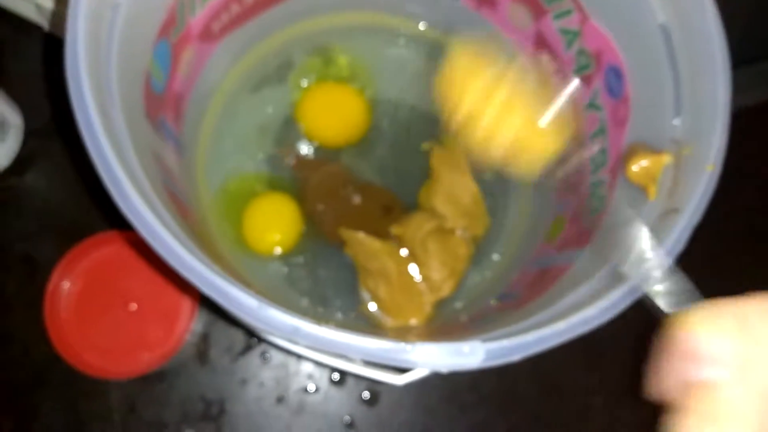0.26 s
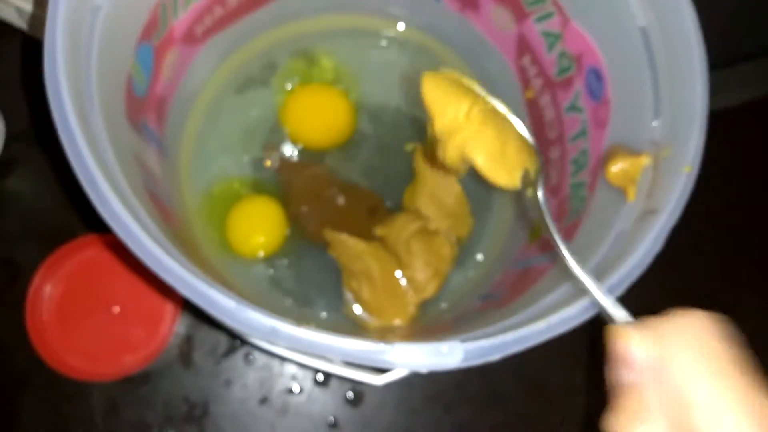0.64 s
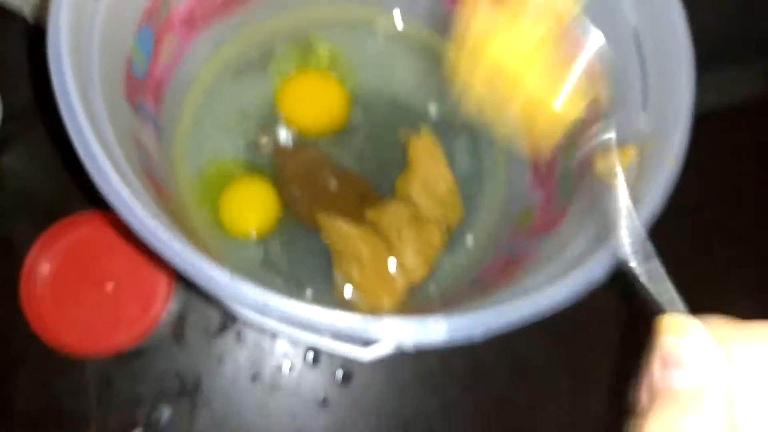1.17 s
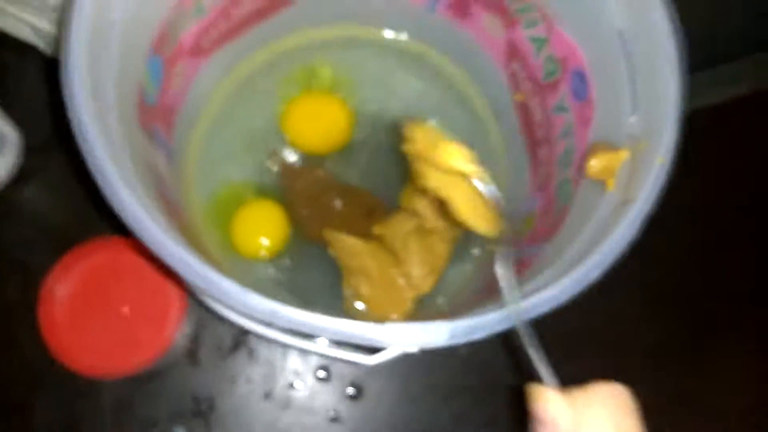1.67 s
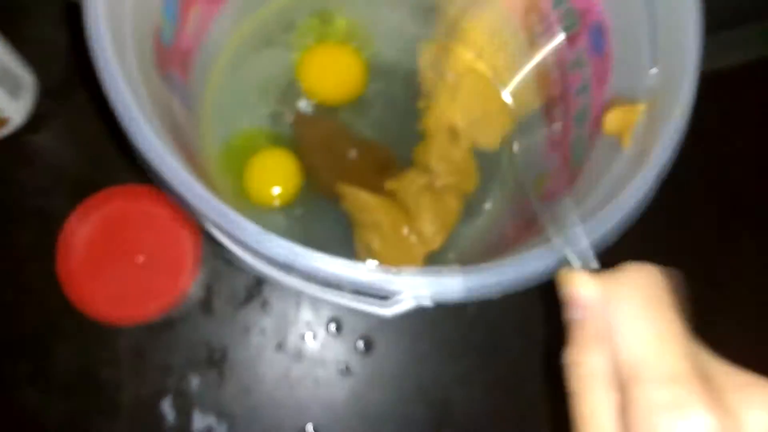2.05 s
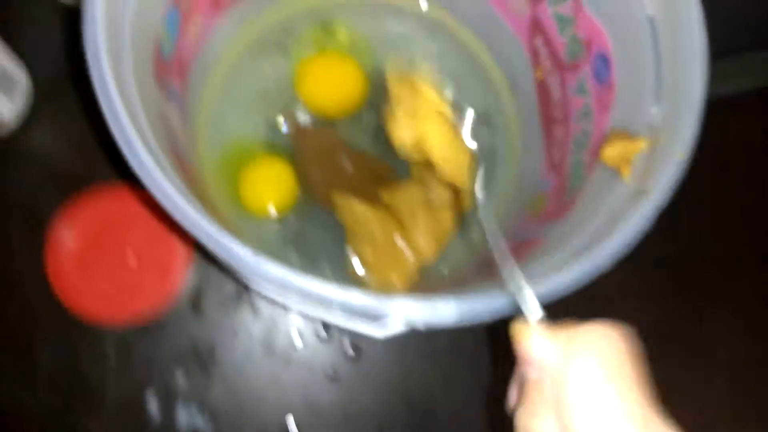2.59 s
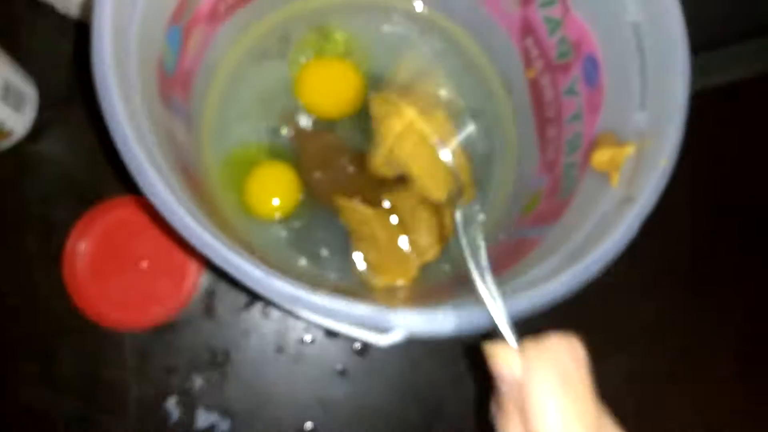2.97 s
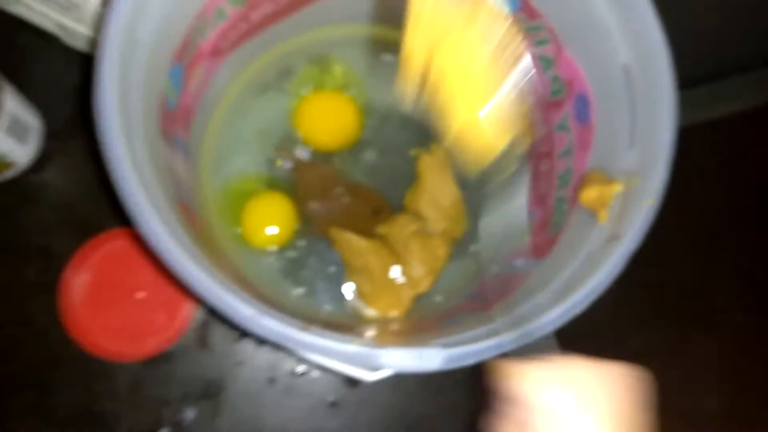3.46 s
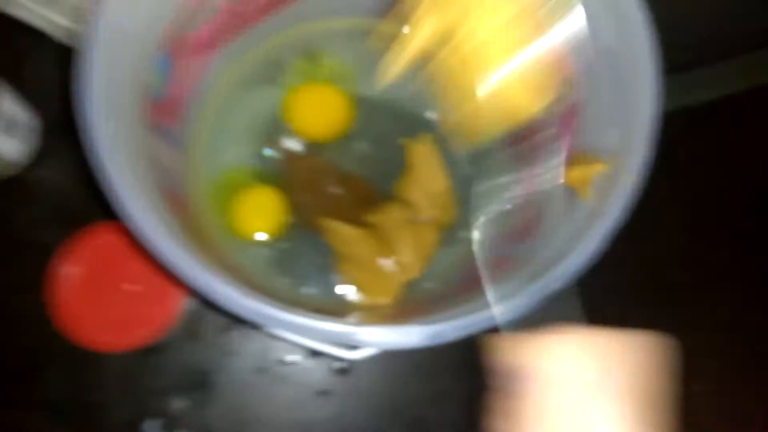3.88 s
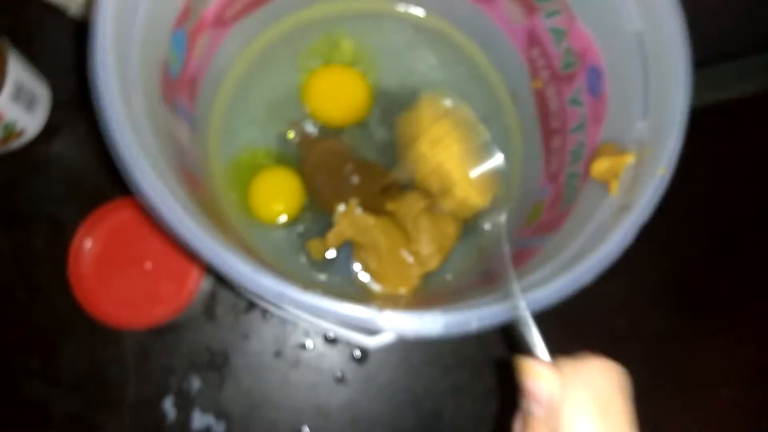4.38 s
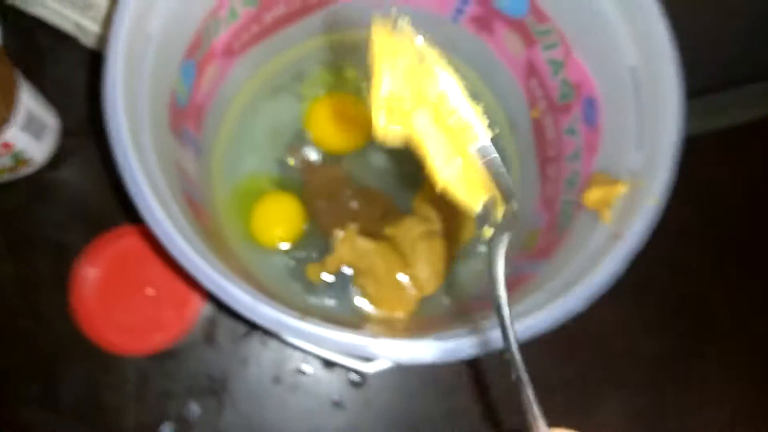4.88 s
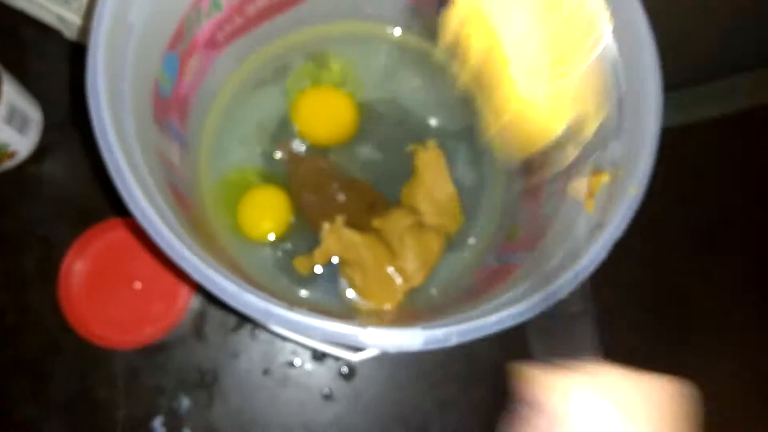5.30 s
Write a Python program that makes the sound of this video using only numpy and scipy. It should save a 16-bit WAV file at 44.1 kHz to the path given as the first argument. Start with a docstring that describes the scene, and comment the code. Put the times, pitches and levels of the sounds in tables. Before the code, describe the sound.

Seventeen sharp, hollow spoon knocks on a plastic bucket rim, very close and distorted, with short echoes and thin sleeve hiss between.

```python
"""A metal spoon is knocked seventeen times on the rim of a plastic tub to shake off sticky spread.
Each knock is a noisy snap, a short hard clack of dying sine waves, then a longer ring and echo.
Sometimes the spoon falls back and brushes the rim. Swelling noise makes a thin hiss, probably a sleeve.
A faint rumble and hum lie beneath. The microphones are so close that loud peaks are cut off flat."""
import sys
import numpy as np
from scipy import signal
from scipy.fft import rfft, irfft
from scipy.io import wavfile
from scipy.ndimage import uniform_filter1d

SR = 44100
rng = np.random.default_rng(int(sys.argv[2]) if len(sys.argv) > 2 else 0)


def inscribe(sig):
    """Save sig as 16-bit PCM at rate SR to the path in sys.argv[1].

    A 1-D sig is mono; a 2-D sig holds one channel per row.
    Samples are clipped to [-1, 1] before scaling.
    """
    pcm = np.round(np.clip(np.atleast_2d(sig).T, -1, 1) * 32767)
    wavfile.write(sys.argv[1], SR, pcm.astype(np.int16))


N = 244388  # samples in the whole scene
LENGTH = 24576  # samples in one knock


def amp(db):
    """Turns decibels into a plain multiplier."""
    return 10 ** (np.asarray(db) / 20)


def evened(x):
    """Scales a sound to an average strength (rms) of 1."""
    return x / np.sqrt(np.mean(x ** 2) + 1e-20)


def read(points, hz):
    """Reads a table between its points, spacing the frequencies as pitch (logarithmically)."""
    f, value = np.transpose(points)
    return np.interp(np.log(hz + 1), np.log(f + 1), value)


def add(mix, s, sound):
    """Adds a stereo sound at a time in seconds, cutting off what runs past the end."""
    start = round(s * SR)
    part = mix[:, start:][:, :sound.shape[1]]
    part += sound[:, :part.shape[1]]


def colour(x, points, size=2048):
    """Filters a sound to the table's tone, without any sound before its cause (minimum phase)."""
    hz = abs(np.fft.fftfreq(size, 1 / SR))
    log_gain = np.log(amp(read(points, hz)))
    response = np.exp(signal.hilbert(log_gain).conj())
    taps = np.fft.ifft(response).real[:size // 2]
    if x.ndim > 1:
        taps = taps[None]
    return signal.oaconvolve(x, taps, axes=-1)[..., :x.shape[-1]]


def dying(t, t60):
    """A fade that loses 60 dB every t60 seconds."""
    return np.exp(-np.log(1000) * t / t60)


def mode(t, hz, t60, left_db, right_db, lag):
    """One way an object vibrates: a dying sine, lag radians later in the right microphone."""
    level = amp([[left_db], [right_db]])
    delay = np.array([[0], [lag]])
    return level * dying(t, t60) * np.sin(2 * np.pi * hz * t - delay)


# how alike the two microphones sound; negative means opposed, as in the bass: (f/Hz, correlation)
LIKENESS = [(60, -0.88), (220, -0.93), (450, -0.55), (800, -0.19), (1200, 0.13), (8000, 0.024)]


def noise(points, size):
    """Noise from all around: two random signals are blended to make left and right suitably alike."""
    hz = np.fft.rfftfreq(size, 1 / SR)
    a, b = rfft(rng.standard_normal((2, size)))
    same = np.clip(read(LIKENESS, hz), -1, 1)
    right = same * a + np.sqrt(1 - same ** 2) * b
    return evened(irfft(np.array([a, right]) * amp(read(points, hz)), size))


# tone of the quiet kitchen's rumble: (f/Hz, relative level/dB)
FLOOR = [(20, -25), (40, -22), (60, -3), (85, -11), (118, -12), (170, -6.5), (450, -7), (800, -16),
         (1700, -27), (4000, -23.5), (15000, -29.5)]
# faint mains hum before the microphone's colour: (f/Hz, level/dB rms)
HUM = [(59.2, -56), (118.4, -49.5)]


def kitchen(floor_db=-52):
    """Steady low noise is the rumble; pure sines, opposed in the two microphones, are the hum."""
    t = np.arange(N) / SR
    hum = sum(amp(db) * evened(np.sin(2 * np.pi * hz * t)) for hz, db in HUM)
    return amp(floor_db) * noise(FLOOR, N) + hum * np.array([[1], [-1]])


# arm swings, probably a sleeve: (t/s, length/s, relative level/dB, rustle level against the hiss/dB)
SWISHES = [(0.026, 0.072, -31, -11.5), (0.421, 0.025, -11.5, -6.5), (1.118, 0.052, -18.5, -15.5),
           (1.487, 0.07, -21.5, -26), (1.626, 0.17, -24.5, -17), (1.947, 0.11, -29.5, -2),
           (2.127, 0.12, -25.5, -10), (2.725, 0.079, -26, -12.5), (3.791, 0.09, -29, -24),
           (3.859, 0.058, -21.5, -28), (4.78, 0.026, -30, -18), (5.24, 0.066, -29.5, -1)]
# tone of the thin hiss: (f/Hz, relative level/dB)
HISS = [(500, -8.5), (2500, -2.5), (5000, 0), (7000, 0), (11500, 0), (15500, 0)]
# tone of the duller rustle under it: (f/Hz, relative level/dB)
RUSTLE = [(200, -22.5), (800, -8), (1700, 0), (2600, -3.5), (4500, -7.5), (7000, -12.5), (10000, -40),
          (15000, -33)]
# every knock stops the arm and jolts the sleeve: length, level, and the rustle against the hiss
JOLT_S, JOLT_DB, JOLT_RUSTLE_DB = 0.051, -28, -9.5
SLEEVE_GROWTH = 0.83  # dB of jolt per dB of knocking force


def swishes(hiss_db=-9, rustle_db=0, rise_s=0.015, fade_t60=0.57, flutter_db=1.03):
    """The sleeve's noise swells at each swing and jolt; the kitchen carries it on as a slow fade."""
    t, hiss_power, rustle_power = np.arange(N) / SR, np.zeros(N), np.zeros(N)
    jolts = [(s, JOLT_S, JOLT_DB + SLEEVE_GROWTH * force_db, JOLT_RUSTLE_DB)
             for s, force_db, _ in KNOCKS]
    for s, length, db, dull_db in SWISHES + jolts:
        rise = 1 - np.exp(-np.maximum(t - s, 0) / rise_s)
        swell = rise * dying(np.maximum(t - s - length, 0), fade_t60)
        # overlapping noises add by power, the square of their level
        hiss_power += (amp(db) * swell) ** 2
        rustle_power += (amp(db + dull_db) * swell) ** 2
    wobble = uniform_filter1d(rng.standard_normal(N), size=160)
    flutter = amp(flutter_db * evened(wobble))
    hiss = amp(hiss_db) * np.sqrt(hiss_power) * noise(HISS, N)
    rustle = amp(rustle_db) * np.sqrt(rustle_power) * noise(RUSTLE, N)
    return flutter * (hiss + rustle)


def tick(spectrum, snap_t60, chatter_db, chatter_t60, room_db=-30, room_t60=0.5):
    """Metal meets plastic: noise with a fast fade (snap), a slower one (chatter) and a faint echo."""
    t = np.arange(LENGTH) / SR
    snap_fade = dying(t, snap_t60)
    chatter_fade = amp(chatter_db) * dying(t, chatter_t60)
    room_fade = amp(room_db) * dying(t, room_t60)
    return noise(spectrum, LENGTH) * (snap_fade + chatter_fade + room_fade)


# tone of the first snap of metal on plastic: (f/Hz, relative level/dB)
CRACK = [(500, 2), (2000, 6), (5000, -0.5), (9000, 2.5), (12000, -6.5), (16000, 0.5)]


def snap():
    """The hard first contact of spoon and rim: a very short burst of noise."""
    return tick(CRACK, snap_t60=0.023, chatter_db=-17.0, chatter_t60=0.088)


# vibrations of rim and spoon, before small pitch shifts:
# (f/Hz, time to fade by 60 dB/s, relative left level/dB, relative right level/dB)
CLACK = [(480.5, 0.046, -2.5, 2), (1064, 0.031, -5, 3), (1209.5, 0.057, -2, -10), (1613, 0.025, 10.5, 10),
         (1693, 0.038, -13.5, -1), (1882.6, 0.027, 5.5, 7.5), (2300, 0.085, -19, -5.5),
         (2706, 0.024, -5, -8.5), (3152, 0.075, -23, -9.5), (4380, 0.079, -36, -23),
         (5150, 0.048, -28, -14), (5880, 0.05, -30, -16.5)]
# single reflections from table, cupboards and walls:
# (delay t/s, left level/dB, right level/dB), both against the direct clack
WALLS = [(.0085, -27, -27), (0.0248, -17.5, -32), (0.0308, -14, -14), (0.0452, -15, -19),
         (.0560, -18.5, -37), (0.092, -24, -22)]


def clack(flex_cycles=1.75, lag=2.21, detune=0.015, give_s=0.000603):
    """The rim gives way, then each mode swings up in a couple of cycles; the spot struck shifts pitch."""
    t = np.maximum(np.arange(LENGTH // 4) / SR - give_s, 0)
    shifts = 1 + detune * rng.standard_normal(len(CLACK))
    direct = np.zeros((2, len(t)))
    for (hz, t60, left_db, right_db), shift in zip(CLACK, shifts):
        swing_up = 1 - np.exp(-(t * hz / flex_cycles) ** 2)
        direct += mode(t, hz * shift, t60, left_db, right_db, lag) * swing_up
    out = np.zeros((2, LENGTH))
    add(out, 0, direct)
    for delay, left_db, right_db in WALLS:
        add(out, delay, amp([[left_db], [right_db]]) * direct)
    return out


# long vibrations of tub, table and kitchen:
# (f/Hz, relative left level/dB, relative right level/dB, time to fade by 60 dB/s)
RING = [(66.6, -22.5, -19.5, 0.69), (133.3, -14, -17.5, 0.44), (179.8, -19, -32.5, 0.25),
        (214, -23.5, -26.5, 0.2), (264, -23, -20.5, 0.59), (292.2, -17.5, -24, 0.44),
        (386.6, -12.5, -15, 0.36), (444, -5, -8.5, 0.35), (481, -17.5, -20, 0.49), (489.4, -10, -15, 0.21),
        (974, -17, -40, 0.36), (1025, -18.5, -50, 0.22), (1090, -46, -30, 0.31), (1159, -16, -9, 0.32),
        (1226, -6.5, -12, 0.21), (1282, -19, -26, 0.51), (1390, -35.5, -36, 0.47), (1460, -40, -35, 0.31),
        (1523, -8.5, -8, 0.15), (1550, -23, -21, 0.26), (1640, -12.5, -18, 0.37), (1690, -9, -8.5, 0.25),
        (1777, -14, -26, 0.16), (1805, -27, -56, 0.3), (1880, -42, -24, 0.49), (2135, -17.5, -21, 0.22),
        (2304, -62, -17, 0.47), (2340, -29, -19.5, 0.31), (2510, -20.5, -19, 0.31),
        (3176, -41, -23.5, 0.54)]


def ring_modes(build_s=0.0063):
    """Tub, table and kitchen ring as dying sines that build up softly, one sound per mode."""
    t, modes = np.arange(LENGTH) / SR, []
    for k, (hz, left_db, right_db, t60) in enumerate(RING, 1):
        lag = np.arccos(np.clip(read(LIKENESS, hz), -1, 1))
        # neighbouring modes of a shell start in opposite directions
        modes.append((-1) ** k * mode(t, hz, t60, left_db, right_db, lag))
    return np.array(modes) * (1 - np.exp(-t / build_s))


# tone of the kitchen's echo of a knock: (f/Hz, relative level/dB)
ECHO = [(25, -21), (50, -7), (100, -6.5), (300, -3.5), (500, -2.5), (720, -10), (1000, -1.5), (1350, -6),
        (1730, 2.5), (2050, -6), (2500, -8.5), (3200, -12), (4500, -20.5), (7500, -27.5), (12000, -36.5)]
# how fast the echo dies: (f/Hz, time to fade by 60 dB/s)
ECHO_T60 = [(60, 0.89), (160, 0.51), (420, 0.38), (1100, 0.55), (2900, 0.54), (7700, 0.44)]


def echo(build_s=0.0025):
    """Blurred kitchen echo: noise builds up, then each band of pitch dies at its own speed."""
    hz, t, bands = signal.stft(noise(ECHO, LENGTH), SR, nperseg=512)
    fade = dying(t, read(ECHO_T60, hz)[:, None])
    tail = signal.istft(bands * fade, SR, nperseg=512)[1][:, :LENGTH]
    return tail * (1 - np.exp(-np.arange(LENGTH) / SR / build_s))


# knocks of the spoon's handle on the rim: (t/s, force level/dB, hardness as upward tilt/dB per octave)
KNOCKS = [(0.3933, -1.5, -1), (0.8528, 4.5, 1), (1.2682, 4.5, 0), (1.4400, -3, 0), (1.6329, 3, 0),
          (2.0564, 0, -0.5), (2.4462, 1, -.5), (2.8196, -2, -1), (2.9671, -2, -.3), (3.1515, 5.5, 1.2),
          (3.5510, -.5, 0), (3.9642, -.5, 0), (4.3483, -4.5, 0.5), (4.4892, -2.5, 1.5), (4.6526, 3, 1),
          (5.0083, 6, 1.5), (5.3695, 3.5, 0.3)]
# ring and echo grow in step with the force; clack and snap by these shares of it (dB per dB)
CLACK_GROWTH, SNAP_GROWTH = 0.37, 0.63
# the snap lies this far above the clack, so a hard blow lifts it most
SNAP_OCTAVES = 2.9


def knocks(clack_db=0.1, ring_db=-5.0, echo_db=-10, snap_db=-12.5, alike=0.56, vary_db=2.5):
    """Knocks land near one spot, so ring and much of the echo repeat; force and hardness set the mix."""
    out, modes, shared_echo = np.zeros((2, N)), ring_modes(), echo()
    for s, force_db, hardness in KNOCKS:
        mode_levels = amp(vary_db * rng.standard_normal(len(RING)))
        ring = np.tensordot(mode_levels, modes, 1)
        room = np.sqrt(alike) * shared_echo + np.sqrt(1 - alike) * echo()
        body = amp(clack_db + CLACK_GROWTH * force_db) * clack()
        body += amp(force_db) * (amp(ring_db) * ring + amp(echo_db) * room)
        # a harder blow sounds brighter: tilt over two octaves either side of 1600 Hz
        body = colour(body, [(400, -2 * hardness), (6400, 2 * hardness)])
        snap_level = amp(snap_db + SNAP_GROWTH * force_db + SNAP_OCTAVES * hardness)
        add(out, s, body + snap_level * snap())
    return out


# loosely held knocks that rebound: (approximate knock t/s, relative rebound level/dB)
REBOUNDS = [(1.260, -18), (2.057, -6.5), (2.448, -10), (2.818, -12), (3.965, -4.5), (4.65, -13)]
# tone of a light brush of the rim: (f/Hz, relative level/dB)
BRUSH = [(500, -5), (1800, 7.5), (5200, -3.5), (8500, -5), (12000, -13.5), (16000, -14)]
REBOUND_S = .068  # the spoon falls back this long after the listed time


def touches(level_db=-6):
    """The spoon rebounds and brushes the rim: a light burst of noise with a little chatter."""
    out = np.zeros((2, N))
    for s, db in REBOUNDS:
        brush = tick(BRUSH, snap_t60=0.015, chatter_db=-14, chatter_t60=0.1)
        add(out, s + REBOUND_S, amp(db + level_db) * brush)
    return out


def scene():
    """Adds up the quiet kitchen, swishes, knocks and light touches."""
    return kitchen() + swishes() + knocks() + touches()


# the left microphone's port resonates in the top treble: (f/Hz, level/dB)
LEFT_PORT = [(150, 2.5), (450, 3), (1000, 1.5), (2400, 0.5), (6000, -0.5), (8000, 2.5), (10000, 10),
             (11600, 18), (13000, 9.5), (15500, -2)]
# the right microphone's port is dull at the top: (f/Hz, level/dB)
RIGHT_PORT = [(150, 0), (450, 0), (1000, -4), (2400, 1.5), (6000, -1), (8000, 3), (10000, -6.5),
              (12000, -5.5), (15500, -19)]
EDGE_HZ = 15800  # the treble stops here


def record(dry):
    """Each microphone port colours the sound, overload cuts its peaks flat, and the top treble is lost."""
    heard = np.array([colour(dry[0], LEFT_PORT), colour(dry[1], RIGHT_PORT)])
    clipped = np.clip(heard, -1, 1)
    treble_cut = signal.firwin(511, EDGE_HZ, window=("kaiser", 9), fs=SR)
    return signal.oaconvolve(clipped, treble_cut[None], "same")


dry = scene()
out = record(dry)
inscribe(out)
```